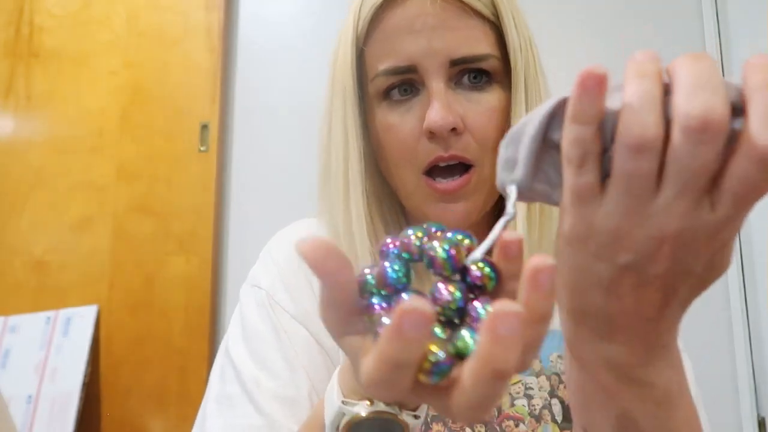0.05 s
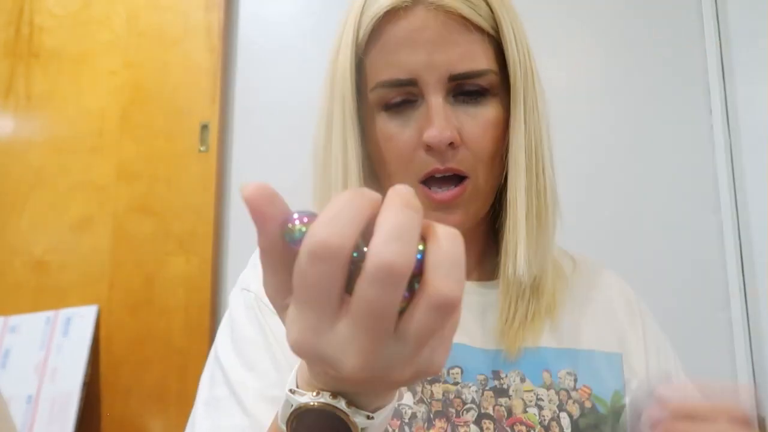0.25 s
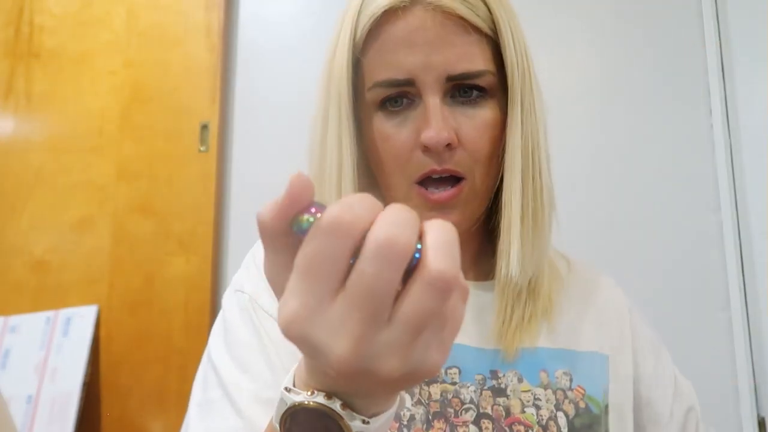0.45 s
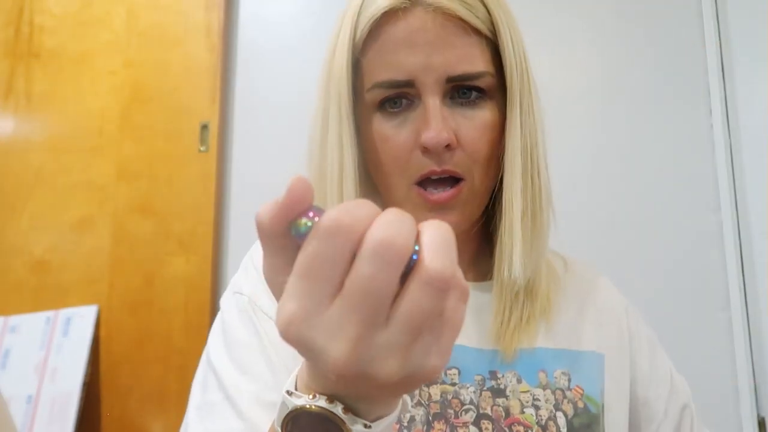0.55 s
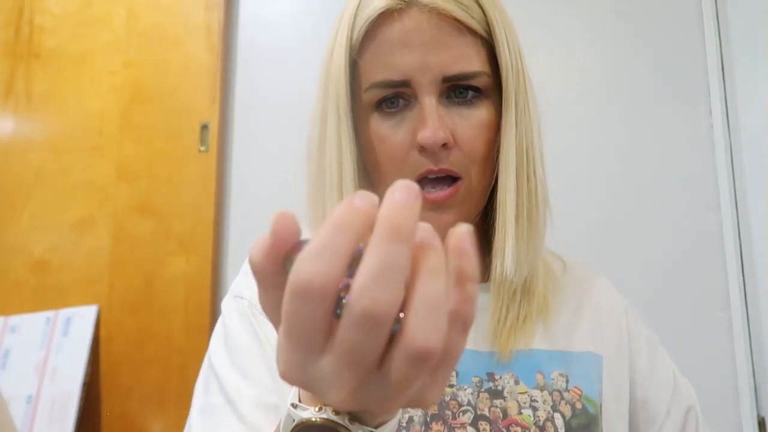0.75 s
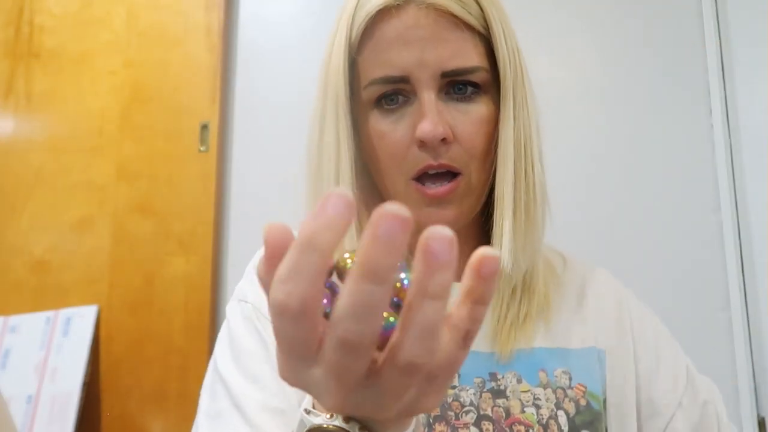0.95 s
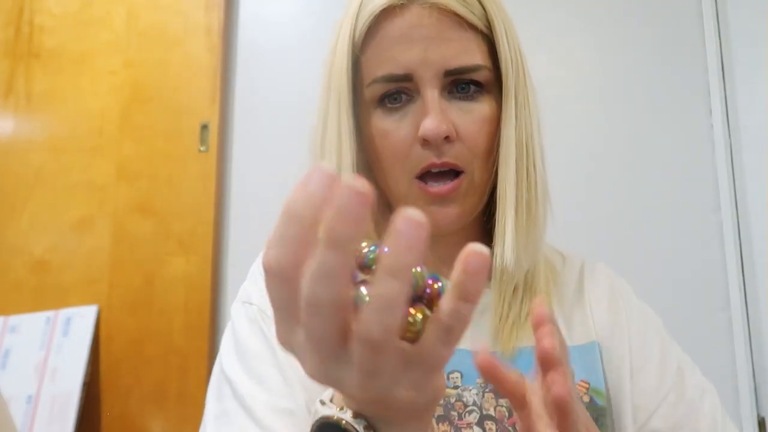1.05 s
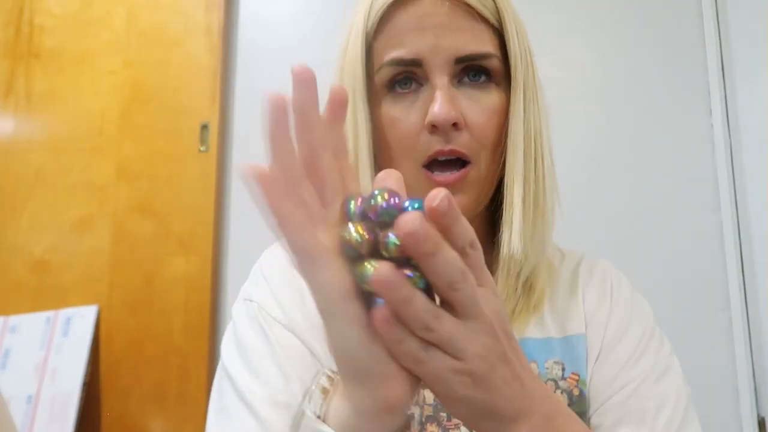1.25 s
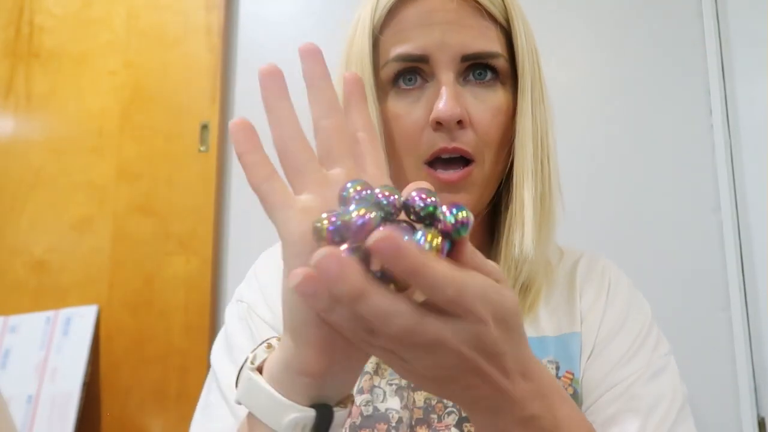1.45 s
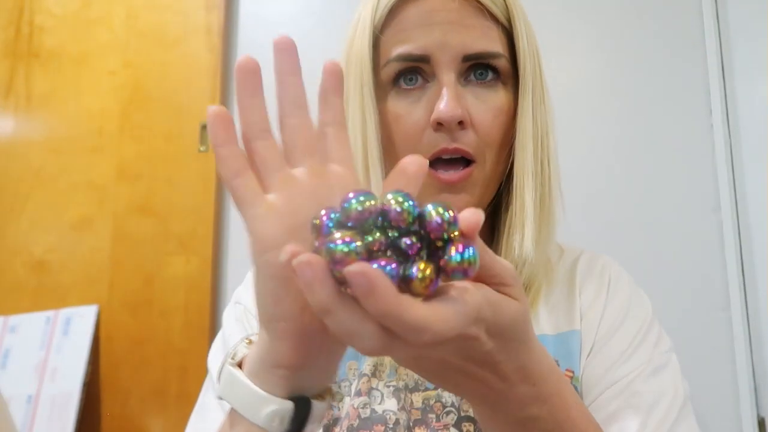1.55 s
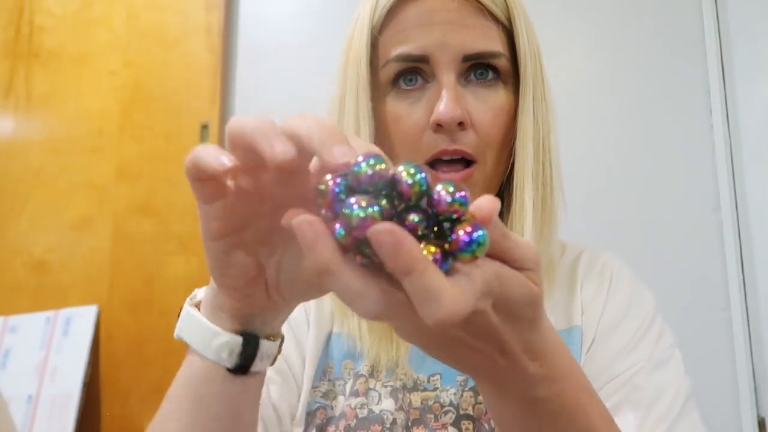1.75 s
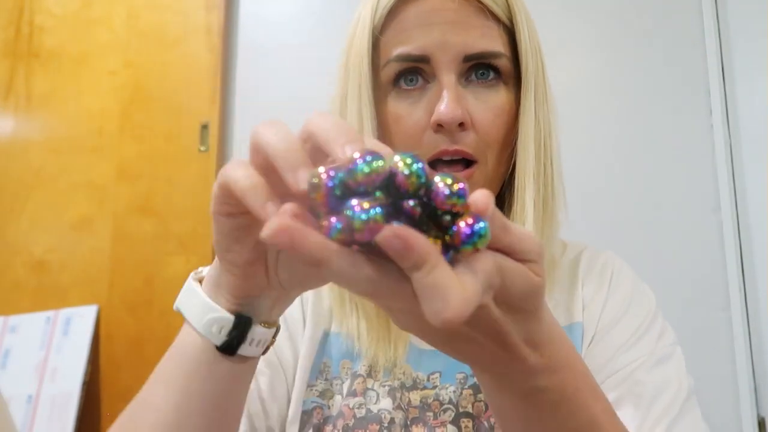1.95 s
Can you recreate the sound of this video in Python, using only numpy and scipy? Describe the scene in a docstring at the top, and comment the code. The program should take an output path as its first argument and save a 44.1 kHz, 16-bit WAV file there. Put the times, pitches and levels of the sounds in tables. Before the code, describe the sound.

Magnetic balls snap together in hands, close by, hard and bright. Light clicks at 0.1 s lead to the loudest clack at 0.24 s, then quick snaps until 0.57 s. Dense rattling bursts follow at 0.77 and 0.94 s. A very faint rising swish fades by 1.3 s, with weak ticks after, a small click at 1.7 s and a clear snap at 1.82 s. Brief room ring, low steady hum.

```python
"""In a small room, a clump of magnetic balls is turned over in two hands, heard from close by.
Each snap is a contact impulse and a burst of noise ricochets lasting milliseconds, filtered by clump and hand.
Each snap also rings the air pocket between balls and palms, a damped sine; faint ticks are weaker snaps.
Delayed copies form near echoes and decaying noise the room's brief ring; one soft swish is gliding narrow noise.
Underneath lie a mains hum of wavering sines and a low ventilation noise of shaped random noise."""
import sys
import numpy as np
from scipy import signal
from scipy.fft import rfft, irfft, next_fast_len
from scipy.io import wavfile
from scipy.ndimage import uniform_filter1d, map_coordinates

SR = 44100
rng = np.random.default_rng(int(sys.argv[2]) if len(sys.argv) > 2 else 0)


def waveform_to_disk(signal):
    """Save audio, clipped to [-1, 1], as 16-bit WAV at the path in sys.argv[1]."""
    frames = np.transpose(np.atleast_2d(signal))
    scaled = np.clip(frames, -1, 1) * 32767
    samples = np.round(scaled).astype(np.int16)
    wavfile.write(sys.argv[1], SR, samples)


N = 88200  # samples

# Balls snapping together: (time [s], snap level [dB], rattle hold [s], treble tilt [dB per octave],
# hollow body [dB], air pocket frequency [Hz], air pocket level [dB], air pocket T60 [s])
SNAP_EVENTS = [ (0.1072, -7.5, .001, -3.5, -7, 2840, -5.5, 0.0054),
               (.1080, -14.5, 0.0006, -4, 0, 3460, -7, 0.0087),
               (0.2038, -13, .0005, -14, -14, 3200, -19.5, 0.013),
               (0.2196, -21.5, .0011, -1, 1, 2400, -18, .005),
               (.2382, 9.5, 0.0013, 4.5, 16.5, 3750, 8.5, 0.0048),
               (.2391, 4, .0007, -5.5, 10.5, 1540, 0.5, 0.0038),
               (0.2399, 5.5, .0004, 7, 7, 2400, 10, 0.0055), (0.3219, -2, .001, 8.5, 6, 3390, 1, 0.0026),
               (.3238, 0.5, .0005, 0, -1, 2380, 3, 0.0085),
               (0.3246, -10.5, 0.00027, 0.5, 6, 2750, -8, 0.0086),
               (0.3614, -1.5, .0002, 4, 14, 3126, 0.5, 0.011),
               (.3631, 0.5, 0.00088, 5.5, 9, 4110, 0, 0.0057), (0.3635, -11, .0003, 4, 4, 1860, -9, 0.0084),
               (.4111, -1.5, 0.00053, 6.5, 11, 4260, 0, 0.0037),
               (.4118, -10.5, 0.00027, 0, -33, 2235, -8, 0.0084),
               (0.5042, -3.5, 0.0039, 1, 0, 3870, -1, .004),
               (0.5641, -8, .0012, 5.5, 1.5, 4110, -19, 0.0098),
               (0.566, -6, 0.00047, 0.5, 11.5, 2480, -7, 0.011),
               (.707, -31, 0.0038, -8, 12, 2300, -25.5, .02),
               (.754, -16.5, .007, -4.5, 0.5, 2310, -27, .01),
               (.7665, -11, 0.0023, -2, 4, 3700, -15.5, 0.007),
               (0.7733, -3.5, 0.0013, 4.5, 5, 1780, -5, 0.0043),
               (.7738, -2, 0.00098, 2, -25, 2478, 0, 0.037),
               (0.7747, -0.5, 0.00034, 1.5, 5, 3540, 0.5, 0.011),
               (0.7793, -7, 0.0023, 10, 0.5, 2480, -7, 0.011),
               (0.7824, -0.5, 0.0038, 1, -4, 3450, -8.5, 0.0099),
               (0.844, -20, .001, -2.5, -5, 3520, -18.5, .008), (.9337, 5, .0001, 3.5, 10, 2504, 5, 0.018),
               (.9352, -3, .0012, -1.5, 3.5, 3550, 0, 0.01),
               (0.9369, 3.5, .0002, 10.5, 11, 4080, -6.5, 0.0035),
               (.9395, -9.5, .0015, -1, 2, 1760, -9, .008), (0.9409, -3, .0015, -1, -3, 3950, -7.5, 0.0054),
               (0.9456, -4.5, 0.00065, 14.5, 7, 3760, -16, 0.0041),
               (0.9469, -2, 0.0013, -3.5, -2, 2477, 1, 0.017),
               (.9490, -2, 0.0031, 0.5, 2, 3050, -2.5, 0.011),
               (1.33, -27, 0.00043, -1, 8, 3350, -24.5, .008),
               (1.3557, -18.5, 0.00036, -2.5, -0.5, 3410, -18, 0.017),
               (1.368, -9, 0.0011, -8.5, -19.5, 3470, -4.5, 0.0048),
               (1.4471, -19.5, 0.0011, -7.5, -9, 2940, -23, 0.0034),
               (1.5116, -22, .0005, -3.5, -6, 3480, -17.5, 0.0059),
               (1.5183, -20.5, .0008, 1, 2.5, 3120, -20, 0.0044),
               (1.6745, -21, 0.00074, 0, -5, 3360, -7, 0.0076),
               (1.7004, -9, 0.001, -0.5, -9.5, 3140, -2, 0.012),
               (1.8167, 1, .0011, 1.5, -4, 4270, 1.5, 0.0067),
               (1.8181, -2, 0.00036, 3.5, 4, 3070, -2, 0.003),
               (1.8197, -6, 0.00067, 2, -1, 2380, -1, 0.0038),
               (1.823, -14.5, .0003, -9, -4, 3700, -14, 0.0044),
               (1.87, -14, .0014, -4, 2, 3290, -17, 0.0058)]
# Relative colour of a snap before clump and hand shape it: (frequency [Hz], density [dB per Hz])
SNAP_COLOUR = [(300, -33), (800, -40), (1150, -22), (1600, -12), (2400, -4), (4000, 0.5), (5300, -6.5),
               (8000, -11), (10000, -17.5), (12800, -16), (16000, -31.5)]
# Resonances of the clump: (frequency [Hz], level over the snap's own colour [dB], width [Hz])
CLUMP_RESONANCES = [(1720, 0.5, 300), (2400, 5.5, 200), (3170, -4.5, 250), (4600, -4.5, 500),
                    (6050, -6.5, 250), (6240, -1, 300), (7730, 2, 330)]
# Echoes of nearby surfaces, before the room colour: (delay [s], level [dB])
NEAR_ECHOES = [(.0085, -15.5), (0.0132, -42.5), (0.011, -21)]
# Decay time of the late room sound: (frequency [Hz], T60 [s])
ROOM_DECAY = [(500, 0.69), (2500, 0.39), (6000, 0.34), (9000, 0.33), (12000, 0.12)]
# Colour of everything the room returns: (frequency [Hz], gain [dB])
ROOM_SPECTRUM = [(500, -8), (1600, -3), (2400, 2), (3300, -2.5), (5500, 5), (8000, 2.5), (12500, 11),
                 (15000, -13)]
# Stereo width of the room's ring: (frequency [Hz], side gain against centre [dB])
ROOM_SIDE = [(500, 3), (1300, -32), (2500, -15.5), (4500, -3), (8000, 5.5)]
# Mains hum components: (frequency [Hz], level [dB rms])
HUM_TONES = [(69, -54.5), (120, -42.5), (240, -53)]
# Relative spectrum of the ventilation noise: (frequency [Hz], density [dB per Hz])
VENT_SPECTRUM = [(20, -28), (40, -0.5), (65, -10.5), (100, 5.5), (180, -8), (300, -4), (450, -6.5),
                 (700, -17), (1200, -17), (2500, -24), (5000, -29), (8000, -37), (11000, -41.5),
                 (16000, -55.5)]
# Left-right likeness of the ventilation noise: (frequency [Hz], correlation [0 to 1])
VENT_LIKENESS = [(60, 1), (130, 0.98), (260, 0.75), (500, 0.57), (1500, 0.45), (8000, 0.072)]

HUM_WAVER_DB, HUM_WAVER_HZ = 0.63, 6.33  # scale of the random level curve, and its knots per second
VENT_DB = -46.5  # rms
CLICK_SIZE = 2048  # samples
FIRST_CONTACT_DB = -6.5  # the first contact against all the ricochets after it
RATTLE_T60_S = 0.0075  # the shock runs through the clump, then dies
CLUMP_SHIFT = 0.036  # the clump changes shape: random fraction by which each resonance moves per snap
BODY_HZ, BODY_OCTAVES = 1515, 0.59  # the hollow of the cupped hand
# Per octave above SOFT_ABOVE_HZ, a snap loses SOFT_DB_PER_DB for each dB it is under HARD_DB
SOFT_ABOVE_HZ, SOFT_DB_PER_DB, HARD_DB = 8150, 1.15, 22.5
POCKET_ATTACK_S = 0.00082
POCKET_TO_ROOM_DB = -7  # the hands aim the pocket's ring at the listener, so the room gets less
TICKS_PER_S, TICK_DB, TICK_SPREAD_DB = 16, -33, 1.5
ROOM_CHANGE_S, ROOM_DELAY_S = 0.15, 0.008
ROOM_DB, EARLY_DB, EARLY_T60_S = -11, -12, 0.051  # levels before side gain and room colour
SLIDE_START_S, SLIDE_LENGTH_S, SLIDE_DB = 0.94, 0.36, -54.5  # rms level before the swell shapes it
SLIDE_FROM_HZ, SLIDE_TO_HZ, SLIDE_WIDTH_HZ = 2350, 3050, 160
TOP_HZ = 16600


def amp(db):
    """Amplitude ratio of a level in decibels."""
    return 10 ** (np.asarray(db) / 20)


def unit(x):
    """Normalization to an rms of 1."""
    return x / np.sqrt(np.mean(x ** 2) + 1e-20)


def along(points, hz):
    """Interpolation of (frequency, value) points on a logarithmic frequency axis."""
    f, v = np.transpose(points)
    return np.interp(np.log(hz + 1), np.log(f + 1), v)


def wobble(rate):
    """Slow random modulation: a smooth curve through rate random knots a second."""
    knots = rng.standard_normal(int(N * rate / SR) + 4)
    return map_coordinates(knots, [np.arange(N) * rate / SR])


def filtered(x, response):
    """Linear filtering: the spectrum of x times a response of frequency."""
    m = next_fast_len(N + SR // 2)
    return irfft(rfft(x, m) * response(np.fft.rfftfreq(m, 1 / SR)), m)[..., :N]


def causal(gain):
    """Minimum phase: folding the cepstrum gives the causal response with this gain."""
    cepstrum = irfft(np.log(np.maximum(gain, 1e-6)))
    half = len(cepstrum) // 2
    cepstrum[1:half] *= 2
    cepstrum[half + 1:] = 0
    return np.exp(rfft(cepstrum))


def add(track, s, sound):
    """Superposition: a sound is summed into the track at s seconds."""
    part = track[max(0, round(s * SR)):][:len(sound)]
    part += sound[:len(part)]


def background():
    """Stationary noise: slightly wavering hum tones over partly correlated ventilation noise."""
    t = np.arange(N) / SR
    hum = np.zeros(N)
    for hz, db in HUM_TONES:
        level = np.sqrt(2) * amp(db + HUM_WAVER_DB * wobble(HUM_WAVER_HZ))
        hum += level * np.sin(2 * np.pi * (hz * t + rng.random()))

    def vent_response(hz):
        """Correlation as an angle: it divides the spectrum between centre and side."""
        angle = np.arccos(np.clip(along(VENT_LIKENESS, hz), -1, 1)) / 2
        return amp(along(VENT_SPECTRUM, hz)) * np.array([np.cos(angle), np.sin(angle)])

    mid, side = filtered(rng.standard_normal((2, N)), vent_response)
    return hum + amp(VENT_DB) * unit(np.array([mid + side, mid - side]))


def clump_gain(hz):
    """Resonance: peaks of the clump add power to the snap, each shifted at random."""
    power = 1
    for f, db, width in CLUMP_RESONANCES:
        centre = f * (1 + CLUMP_SHIFT * rng.normal())
        power = power + amp(db) ** 2 / (1 + (2 * (hz - centre) / width) ** 2)
    return np.sqrt(power)


def snap(snap_db, hold_s, tilt_db, body_db):
    """Impact excitation: a contact and its ricochets, coloured by clump and hand; harder is brighter."""
    t = np.arange(CLICK_SIZE) / SR
    hz = np.fft.rfftfreq(CLICK_SIZE, 1 / SR) + 1
    fade = amp(-60 * np.maximum(t - hold_s, 0) / RATTLE_T60_S)
    ricochets = rng.standard_normal(CLICK_SIZE) * fade
    # a constant spectrum is an impulse: the first contact
    burst = amp(FIRST_CONTACT_DB) + rfft(ricochets / np.linalg.norm(ricochets))
    # the burst's smoothed spectrum is divided out, so the colours below set the balance
    even = np.sqrt(np.abs(uniform_filter1d(np.abs(burst) ** 2, size=24)))
    clump = clump_gain(hz)
    octaves = np.log2(hz / BODY_HZ)
    hand_db = tilt_db * np.maximum(octaves, 0) + body_db * np.exp(-.5 * (octaves / BODY_OCTAVES) ** 2)
    soft_octaves = np.log2(np.maximum(hz / SOFT_ABOVE_HZ, 1))
    soft_db = SOFT_DB_PER_DB * min(snap_db - HARD_DB, 0) * soft_octaves
    gain = amp(along(SNAP_COLOUR, hz) + hand_db + soft_db) * clump / even
    x = irfft(burst * causal(gain))
    return amp(snap_db) * x / np.linalg.norm(x)


def ring(hz, t60):
    """Damped cavity resonance: a decaying sine with a soft attack, of energy 1."""
    t = np.arange(CLICK_SIZE) / SR
    attack = (1 - np.exp(-t / POCKET_ATTACK_S)) ** 2
    x = np.sin(2 * np.pi * hz * t) * amp(-60 * t / t60) * attack
    return x / np.linalg.norm(x)


def balls():
    """Impact and response: the snaps, and the air pockets that they ring, on separate tracks."""
    snaps, pockets = np.zeros(N), np.zeros(N)
    for s, snap_db, hold_s, tilt_db, body_db, pocket_hz, pocket_db, pocket_t60 in SNAP_EVENTS:
        add(snaps, s, snap(snap_db, hold_s, tilt_db, body_db))
        add(pockets, s, amp(pocket_db) * ring(pocket_hz, pocket_t60))
    return snaps, pockets


def ticks():
    """Random weak impacts: balls roll and settle against each other in the palm."""
    x = np.zeros(N)
    for _ in range(int(TICKS_PER_S * N / SR)):
        s = rng.random() * N / SR
        tick_db = TICK_DB + TICK_SPREAD_DB * rng.normal()
        add(x, s, snap(tick_db, hold_s=0.0033, tilt_db=-8.5, body_db=9.5))
    return x


def room_tail():
    """Diffuse decay: fast-fading early noise and a frequency-dependent late tail, centre and side."""
    hz, t, z = signal.stft(rng.standard_normal((2, SR // 3)), SR, nperseg=256)
    decay = amp(-60 * t / along(ROOM_DECAY, hz)[:, None])
    late = signal.istft(z * decay, SR, nperseg=256)[1]
    early_fade = amp(-60 * np.arange(late.shape[1]) / SR / EARLY_T60_S)
    early = rng.standard_normal(late.shape) * early_fade
    # both are scaled by the energy of the centre
    late = amp(ROOM_DB) * late / np.linalg.norm(late[0])
    return late + amp(EARLY_DB) * early / np.linalg.norm(early[0])


def room(x):
    """Reflection and reverberation: near echoes, and a tail redrawn at each step as the hands move."""
    mid, side = np.zeros((2, N))
    step = round(ROOM_CHANGE_S * SR)
    for i in range(0, N, step):
        wet = signal.fftconvolve(x[None, i:i + step], room_tail(), axes=1)
        add(mid, i / SR + ROOM_DELAY_S, wet[0])
        add(side, i / SR + ROOM_DELAY_S, wet[1])
    side = filtered(side, lambda f: amp(along(ROOM_SIDE, f)))
    diffuse = np.array([mid + side, mid - side]) / np.sqrt(2)

    def echo_response(f):
        """Pure delay: a phase that is linear in frequency."""
        return sum(amp(db) * np.exp(-2j * np.pi * f * s) for s, db in NEAR_ECHOES)

    echoes = filtered(x, echo_response)
    return filtered(diffuse + echoes, lambda f: amp(along(ROOM_SPECTRUM, f)))


def slide():
    """Narrow-band friction noise, probably the clump sliding over the palm as the hand opens.

    It swells and fades while its resonance glides up and levels off.
    """
    u = np.clip((np.arange(N) / SR - SLIDE_START_S) / SLIDE_LENGTH_S, 0, 1)
    hz = SLIDE_FROM_HZ + (SLIDE_TO_HZ - SLIDE_FROM_HZ) * (1 - (1 - u) ** 2)
    # two slow noises modulate a gliding carrier in quadrature
    a, b = filtered(rng.standard_normal((2, N)), lambda f: 1 / (1 + (f / SLIDE_WIDTH_HZ) ** 2))
    phase = 2 * np.pi * np.cumsum(hz) / SR
    rubbing = unit(a * np.cos(phase) + b * np.sin(phase))
    return amp(SLIDE_DB) * np.sin(np.pi * u) * rubbing


def scene():
    """Superposition of direct sound in the centre, the room around it and the background."""
    floor = background()
    snaps, pockets = balls()
    snaps = snaps + ticks()
    reflected = room(snaps + amp(POCKET_TO_ROOM_DB) * pockets)
    return floor + snaps + pockets + slide() + reflected


def record(dry):
    """Band limiting: only components below TOP_HZ pass."""
    return filtered(dry, lambda hz: hz < TOP_HZ)


dry = scene()
out = record(dry)
waveform_to_disk(out)
```